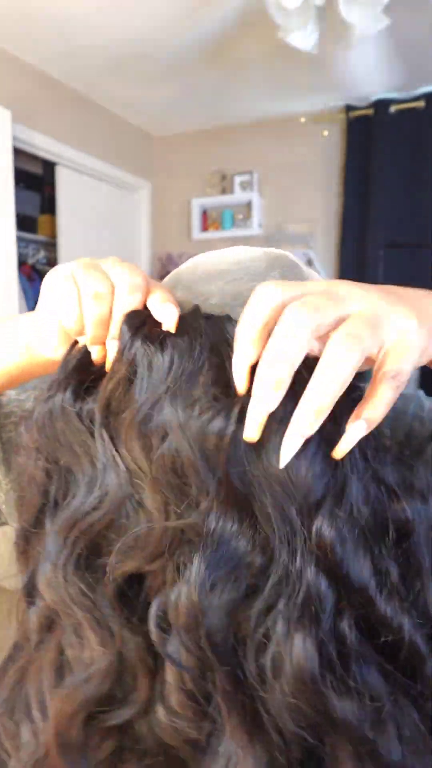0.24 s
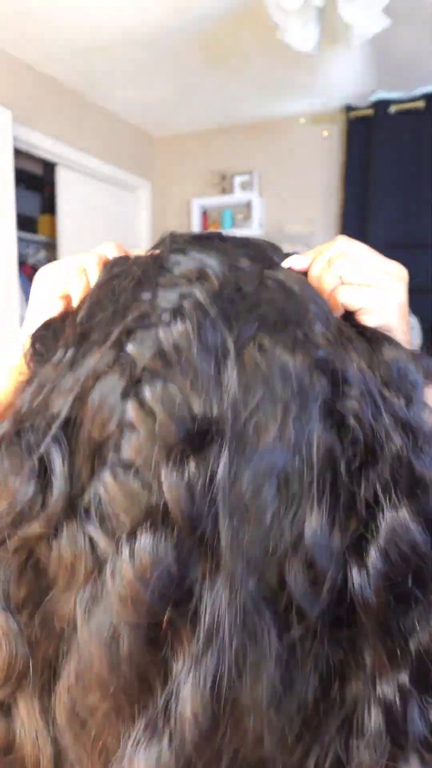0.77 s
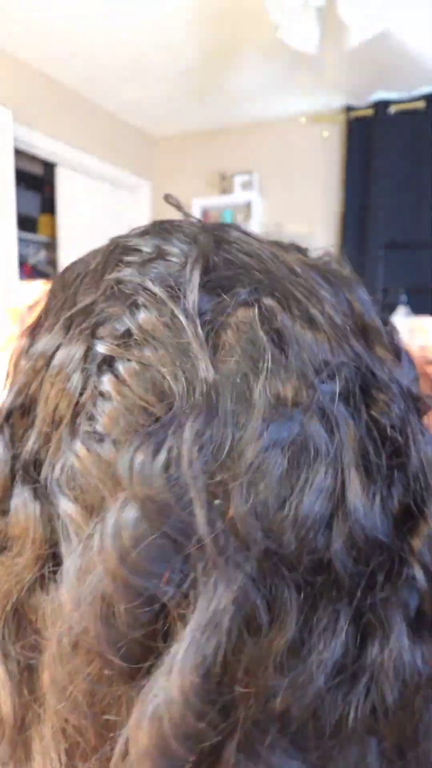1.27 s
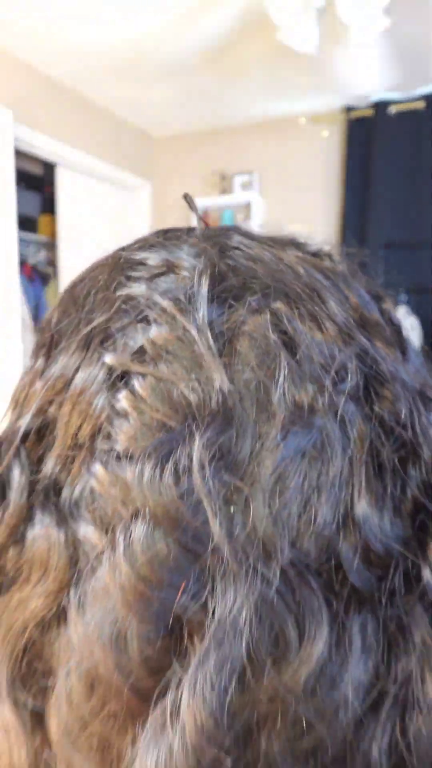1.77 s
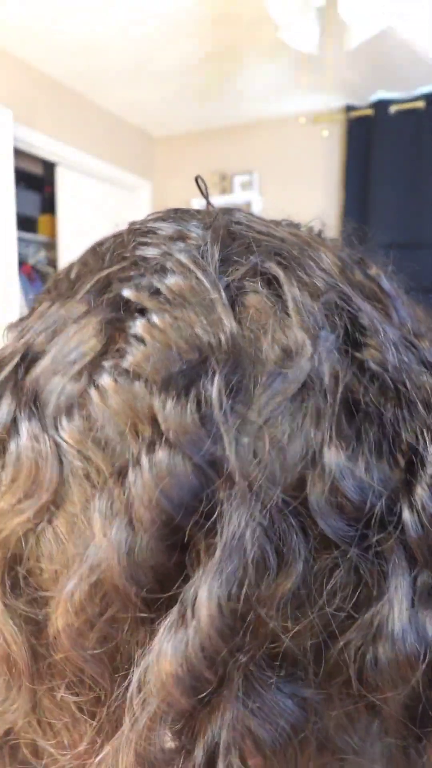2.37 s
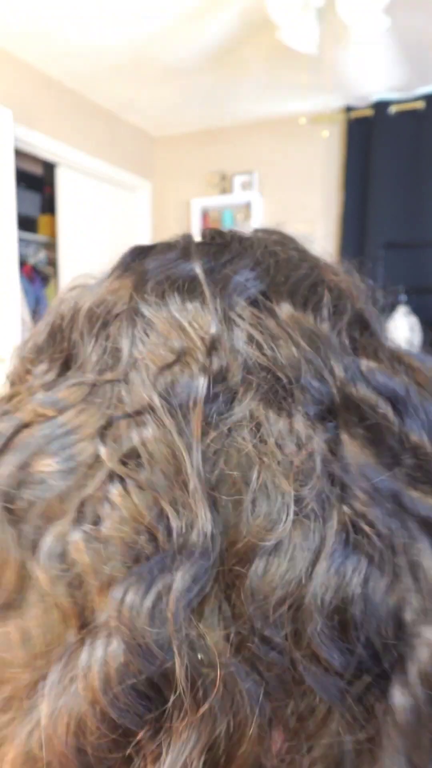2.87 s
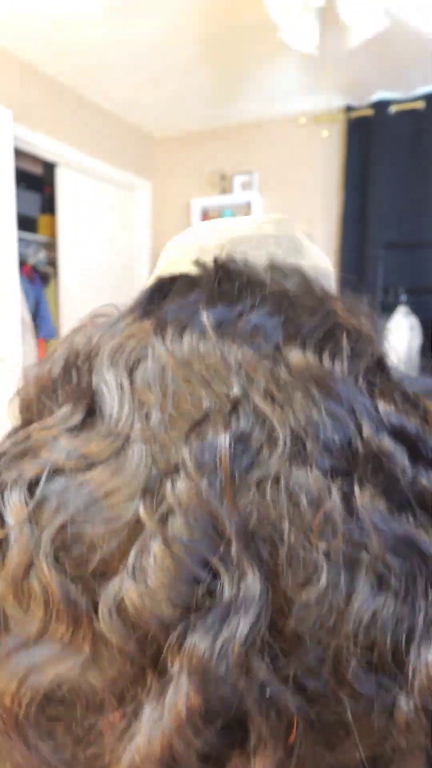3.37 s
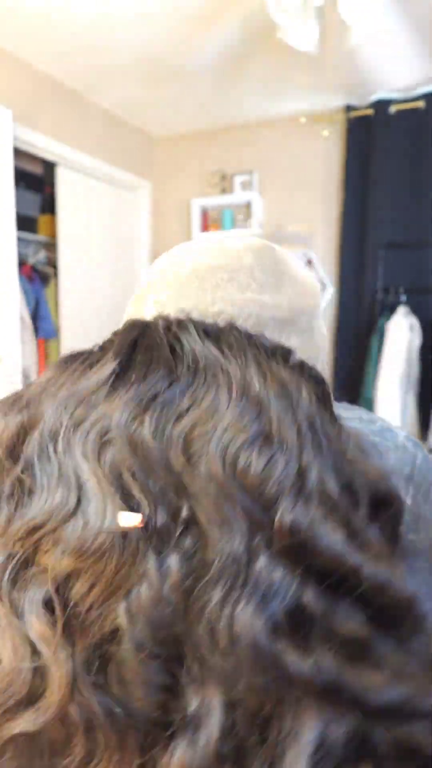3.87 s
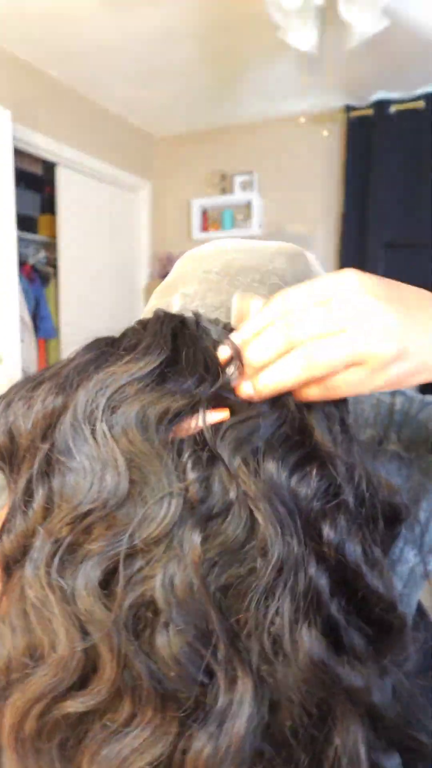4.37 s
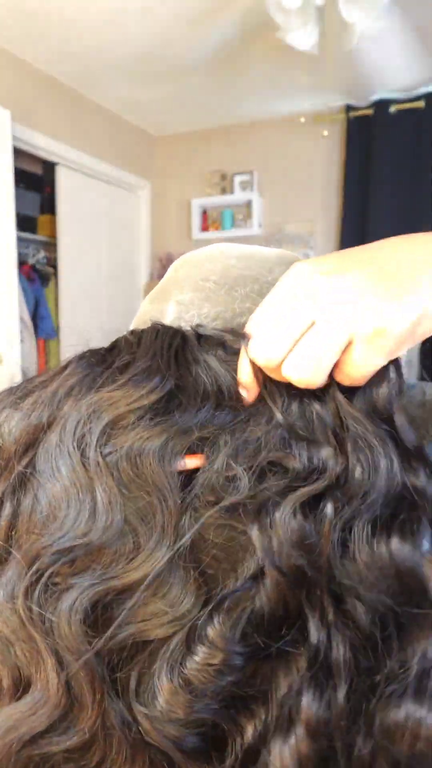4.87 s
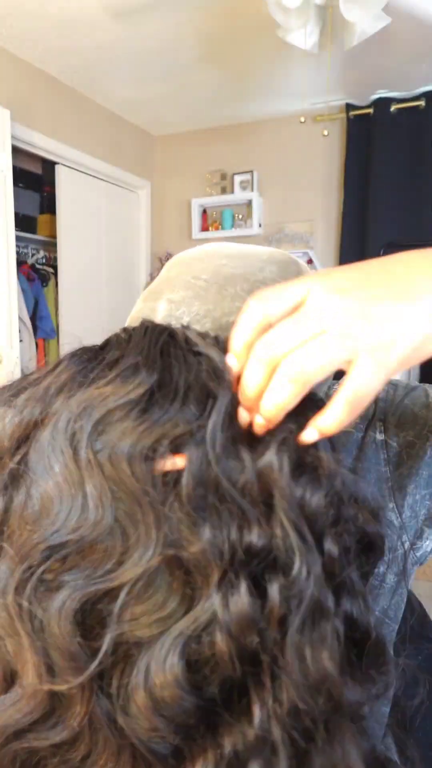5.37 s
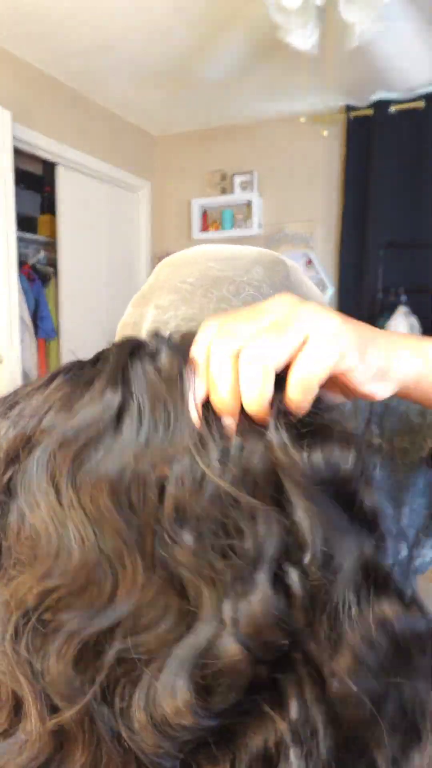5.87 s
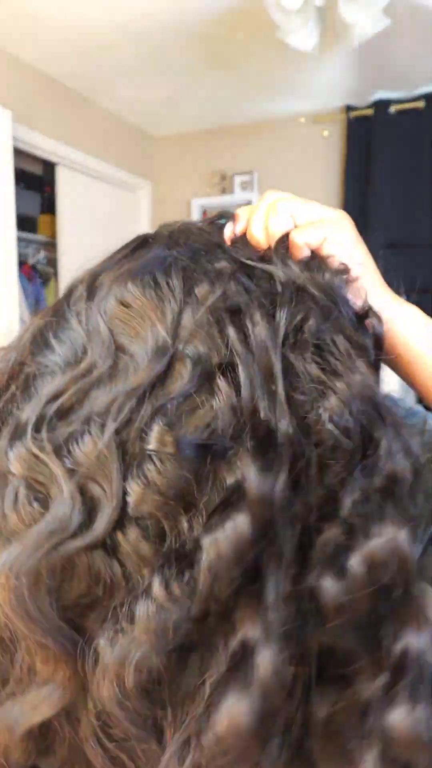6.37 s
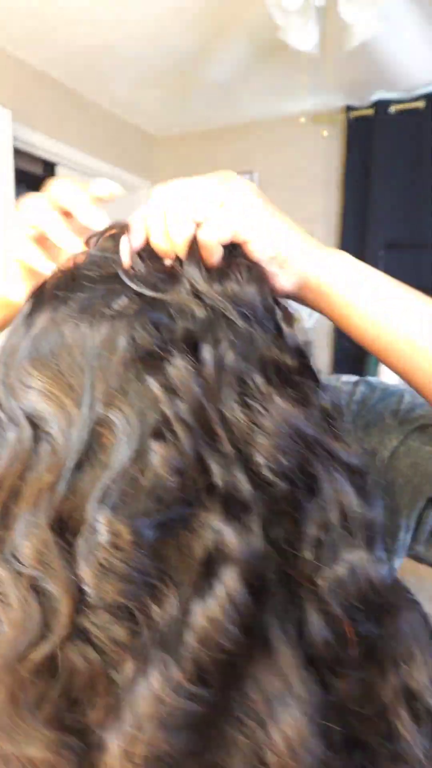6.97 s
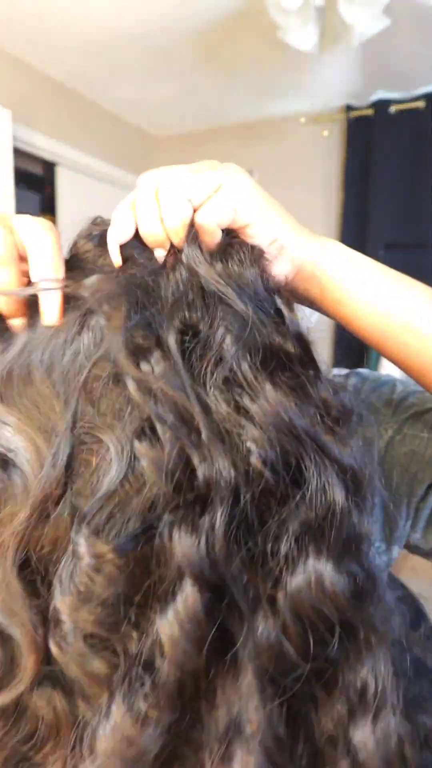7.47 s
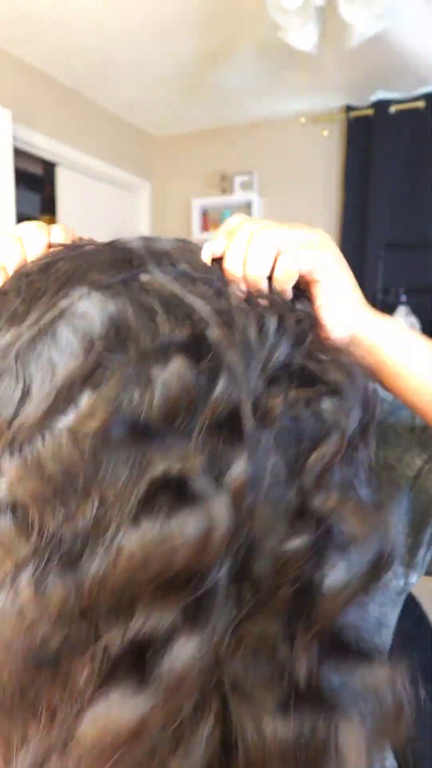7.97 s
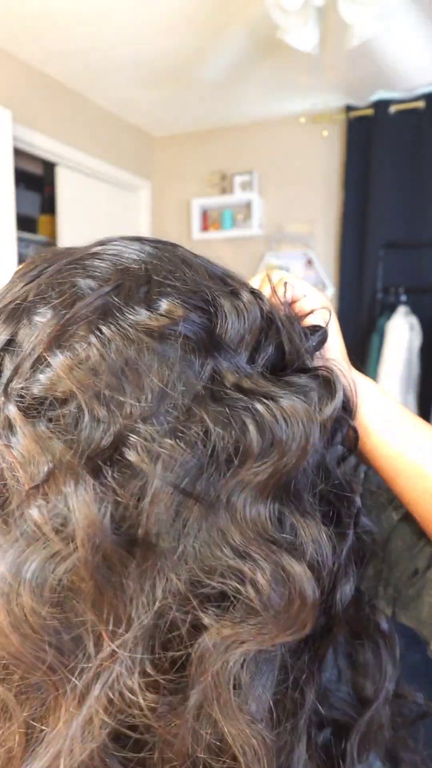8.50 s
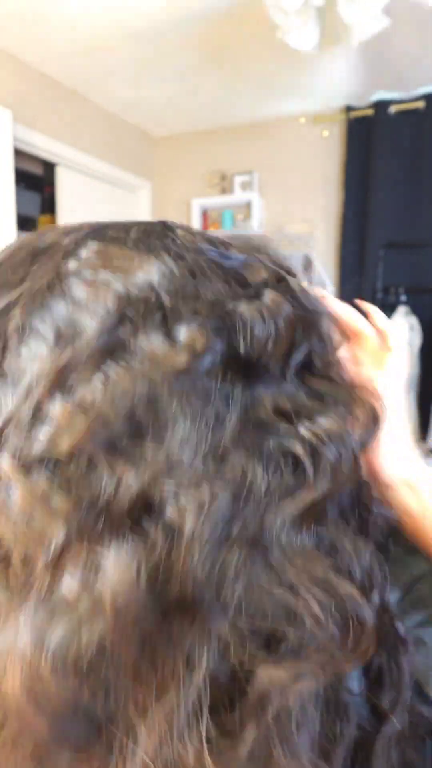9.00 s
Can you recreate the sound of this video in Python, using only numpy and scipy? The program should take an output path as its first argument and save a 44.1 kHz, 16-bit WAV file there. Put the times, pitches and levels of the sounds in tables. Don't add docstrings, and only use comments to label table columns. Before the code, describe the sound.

Close, crisp rustles and snapping snags of wavy fake hair being pulled about on a wig cap, in a quiet bedroom with faint motor hum.

```python
import sys
import numpy as np
from scipy import signal
from scipy.fft import rfft, irfft
from scipy.io import wavfile
from scipy.ndimage import uniform_filter1d, map_coordinates

SR = 44100
rng = np.random.default_rng(int(sys.argv[2]) if len(sys.argv) > 2 else 0)


def generate_wav(signal):
    frames = np.transpose(np.atleast_2d(signal))
    scaled = np.clip(frames, -1, 1) * 32767
    pcm = np.round(scaled).astype(np.int16)
    wavfile.write(sys.argv[1], SR, pcm)


def invert_db(level):
    return 10 ** (np.asarray(level, dtype=float) / 20)


N = 407484

# f/Hz, level/dB per Hz
HOUSE_COLOUR = [(25, -46), (45, -24), (100, 1.5), (170, 2.5), (250, 2), (340, -4), (400, -10.5),
                (600, -13.5), (1000, -20), (2000, -23), (4000, -26.5), (9000, -31), (15780, -39),
                (15950, -90)]
# f/Hz, width/Hz, level/dB rms
AIR_RESONANCES = [
    (57.2, 20, -69),
    (121.4, 11, -55.5),
    (143.8, 10.2, -55),
]
# f/Hz, level/dB per Hz
HAIR_COLOUR = [(500, 12), (800, 0.5), (1300, -7.5), (2400, -4.5), (3000, 0), (5000, 5), (8000, 5.5),
               (11000, 12.5), (13000, 11.5), (15300, 18), (15780, 4), (15950, -60)]
RANGE_EDGES_HZ = (1000, 3100, 9500, 15950)
# level/dB of cloth, fibres, finest strands
REST_LEVELS_DB = (-90, -86, -70)
# t/s at start of hold, hold/s, fibre level/dB, rise/ms per 10 dB,
# finer strands level/dB
PULLS = [(0, 0.03, -65, 50, -6), (0.557, 0.16, -50.5, 300, -1.5), (0.808, 0.014, -40, 53, 2),
         (0.86, 0.023, -46.5, 50, 0), (2.2, 0.17, -70, 200, 6.5), (2.44, 0.14, -58, 40, 3),
         (2.634, 0.044, -57, 200, 2.5), (2.755, 0.052, -47, 120, -1), (2.988, 0.039, -48.5, 90, 3),
         (3.237, 0.039, -55, 93, 0), (3.384, 0.016, -45, 88, 3), (5.174, 0.058, -62, 32, 1),
         (6.016, .34, -53, 180, 1), (7.7, .03, -58.5, 60, 4), (7.752, .02, -50, 40, 5),
         (7.883, .1, -50, 60, -0.5), (8.058, 0.09, -57, 100, 0), (8.331, 0.045, -49.5, 197, 1.5),
         (8.67, .08, -70, 100, 10)]
# t/s at peak, fibre level/dB, fade/ms per 10 dB, finer strands level/dB
STROKES = [(.127, -52, 100, 0), (.382, -51, 152, -1), (1.17, -57.5, 120, -7), (1.05, -59, 100, 1),
           (1.63, -59, 60, 5), (2.048, -61.5, 100, -9), (3.52, -64.5, 300, 4.5), (3.94, -72, 100, 14),
           (4.148, -65, 120, -4), (4.378, -57.5, 141, 3.5), (4.612, -64, 300, 6), (4.835, -53, 40, 2),
           (4.956, -59.5, 85, 1), (5.45, -55.5, 110, -3), (5.76, -62.5, 150, 0), (6.5, -63, 300, 6.5),
           (6.86, -61, 78, -8), (7.106, -60, 250, 3.5), (7.18, -65, 56, 8), (7.52, -63.5, 150, 9),
           (7.61, -55.5, 100, 5), (8.593, -54.5, 200, 6), (8.95, -55.5, 154, -2)]
# t/s, fibre level/dB, fade/ms per 10 dB, finer strands level/dB
SLITHERS = [
    (1.673, -39.5, 38, -7),
    (1.785, -53.5, 66, 0),
    (5.665, -57, 60, 3),
    (6.795, -54, 40, -8),
    (7.402, -56, 60, 2),
    (8.893, -55.5, 200, 0),
]
# t/s, level/dB against the fibres
CAP_DRAG = [(0, -8), (.5, -4.5), (1, -4), (1.6, -10.5), (2.7, -7), (4.6, -12.5), (5.4, -8), (6.2, -9),
            (7.3, -8.5), (7.9, -9), (8.6, -8), (9.24, -5)]
# t/s, fibre peak level/dB, cap cloth level/dB and finest strands level/dB against the fibres
SNAPS = [(.0794, -36.5, -4, 11), (.119, -26, -22, -13), (.2313, -33, -2.5, 1), (.3775, -33, 2, -8),
         (.4606, -37, -17, -3), (.6874, -31, -13, -15), (.7527, -27, -8, -13), (.81, -26, -12, -6),
         (.828, -16, -14, -17), (.861, -23, -24, -6), (.9021, -28.5, 1, -7), (1.7804, -26.5, -26, 7),
         (1.8056, -29, -21, -1), (2.419, -23, -26, -10), (2.4311, -31, -13, 3), (4.9839, -34.5, -18, -16),
         (5.228, -29, -18, -10), (5.6652, -35, -19, -9), (6.79, -17, -43, 3), (7.3995, -27, -22, 9),
         (7.4097, -36, -14, 12), (7.6084, -32.5, -14, 12.5), (7.7189, -31, -24, 2), (7.7313, -20, -30, -4),
         (7.7416, -20, -15, 13), (7.752, -30, -12, 5), (7.7989, -29, -8, -3), (7.8908, -20, -9, -9),
         (7.9526, -27, -14, -3), (8.3363, -21.5, -17, -2)]
# t/s, fibre peak level/dB, finest strands level/dB against the fibres
TICKS = [(.1127, -36, 0), (.6328, -39, -2), (.734, -30, -8), (.9302, -35, -3), (1.0521, -39, -8),
         (1.6101, -38, -11), (1.8332, -36, -4), (3.931, -43, 3), (4.241, -52, 17.5), (4.3717, -53, 15),
         (4.6448, -60, 19), (4.799, -54, 11), (4.9394, -38, -11), (5.4146, -36, -9), (5.481, -41, -11),
         (5.5732, -48, 6), (5.6873, -36, -18), (7.2501, -36.5, -7), (7.604, -43, 8), (8.353, -36, -10),
         (8.962, -37, 4), (9.05, -40, -6), (.572, -33, -4), (.939, -41, -4), (1.061, -41, -14),
         (4.832, -37, 0), (7.618, -42, 6)]
# t/s, fibre peak level/dB, finest strands level/dB against the fibres, decay/ms
RIPS = [
    (1.672, -28.5, -4, 5.3),
    (1.683, -25.5, -3, 4.7),
    (3.42, -35, 2, 1.5),
    (5.662, -36, -11, 3),
    (6.997, -41, -2, 1.6),
    (7.07, -49, -2, 1.1),
    (7.7488, -30, 8, 1.4),
]
# t/s, level/dB left minus right
HAND_PLACE = [
    (0, 2),
    (1.1, .3),
    (1.6, 12.5),
    (1.85, 2.5),
    (2.4, 2),
    (4, 0),
    (5.7, 3),
    (6.8, 3),
    (7.25, -3.5),
    (7.74, 2),
]
# t/s, peak level/dB, rise/ms, decay/ms, top f/Hz
BUMPS = [(.118, -43, 3.5, 11, 2000), (0.732, -47, 1.4, 45, 800), (4.245, -38.5, 12, 33, 750),
         (4.243, -49, 10, 24, 2000), (0.901, -47.5, 1.8, 23, 1400), (5.227, -47, 1.8, 9.1, 900),
         (6.52, -46, 8, 24, 390), (6.86, -49.5, 6.8, 25, 402), (7.25, -51, 2, 5, 1500),
         (7.739, -53, 1.8, 8, 900), (8.352, -60, 2.7, 15, 1800)]
# t/s, peak level/dB, ring f/Hz, t60/ms
KNOCKS = [(8.3535, -33, 1370, 10), (7.8905, -25, 2750, 9), (7.8905, -43, 1300, 18), (7.8905, -34, 1760, 12),
          (6.79, -43, 2340, 12), (0.19, -45, 2950, 12), (6.5, -46, 1070, 15), (6.79, -23, 10200, 8),
          (7.3995, -18, 11500, 5), (7.3995, -37, 3400, 8), (6.79, -27, 6200, 8), (7.7416, -13, 11500, 5),
          (2.419, -36, 3400, 8)]
# t/s, lag/ms, share of the direct sound
TABLE_BOUNCE = [
    (0, .655, .22),
    (3.5, .647, .2),
    (4.2, .647, .4),
    (5.8, .647, .38),
    (6.1, .63, .3),
    (6.9, .605, .2),
    (8, .6, .1),
    (9.24, .64, .1),
]


def level(x, db):
    return x * invert_db(db) / np.sqrt(np.mean(x ** 2))


def colour(x, points):
    hz, db = np.transpose(points)
    bins = np.fft.rfftfreq(N, 1 / SR) + 1
    gain = invert_db(np.interp(np.log(bins), np.log(hz), db))
    return irfft(rfft(x) * gain, N)


def band(x, lo_hz, hi_hz):
    sos = signal.butter(2, [lo_hz, hi_hz], "bandpass", fs=SR, output="sos")
    return signal.sosfilt(sos, x)


def walk(rate_hz):
    hold = int(SR / rate_hz)
    held = np.repeat(rng.standard_normal(N // hold + 1), hold)
    return 1.31 * uniform_filter1d(uniform_filter1d(held, hold), hold)[:N]


def opposed(x):
    return np.array([[x], [-x]])


def wide(mid, other, side_db):
    return mid + invert_db(side_db) * other * opposed(1)


def ranges(x):
    n = x.shape[-1]
    bins = np.fft.rfftfreq(n, 1 / SR) + 1
    spectrum = rfft(x)
    steepness = (6, 9, 8, 150)
    above = [1 / (1 + (hz / bins) ** steep) for hz, steep in zip(RANGE_EDGES_HZ, steepness)]
    return [irfft(spectrum * (above[k] - above[k + 1]), n) for k in range(3)]


def house():
    mid, other = (colour(rng.standard_normal(N), HOUSE_COLOUR) for _ in range(2))
    other = signal.lfilter(*signal.butter(1, 350, "highpass", fs=SR), other)
    return level(wide(mid, other, side_db=-4.5), -53.5)


def fan():
    motor_hz, motor_db = 258.6, -49
    strength = np.sqrt(2) * invert_db(motor_db + .5 * walk(2.85))
    tone = strength * np.sin(2 * np.pi * motor_hz * np.arange(N) / SR)
    air = 0
    for hz, width_hz, db in AIR_RESONANCES:
        air = air + level(band(rng.standard_normal(N), hz - width_hz / 2, hz + width_hz / 2), db)
    return tone * invert_db(opposed(1.7)) + air


def fibre_slips(share, scatter_db):
    size = invert_db(scatter_db * rng.exponential(size=N)) * rng.standard_normal(N)
    return np.clip(size, -7, 7) * (rng.random(N) < share)


def effort(s, hold_s, db, rise_ms, fade_ms):
    t_ms = 1000 * (np.arange(0, N, 64) / SR - s)
    away = np.maximum(-t_ms / rise_ms, (t_ms - 1000 * hold_s) / fade_ms)
    return invert_db(db - 10 * np.maximum(away, 0)) ** 2


def drag():
    release_ms = 59.5
    sudden_ms = 7
    moves = []  # (power, finer strands dB)
    for s, hold_s, db, rise_ms, fine_db in PULLS:
        moves.append((effort(s, hold_s, db, rise_ms, release_ms), fine_db))
    for s, db, fade_ms, fine_db in STROKES:
        rise_ms = 16.6 + .6 * fade_ms
        moves.append((effort(s, 0, db, rise_ms, fade_ms), fine_db))
    for s, db, fade_ms, fine_db in SLITHERS:
        moves.append((effort(s, 0, db, sudden_ms, fade_ms), fine_db))

    steps = np.arange(0, N, 64)
    fibres = sum(power for power, _ in moves)
    finest = sum(power * invert_db(-2 + fine_db) ** 2 for power, fine_db in moves)
    cloth = fibres * invert_db(np.interp(steps / SR, *np.transpose(CAP_DRAG))) ** 2
    gains = []
    for power, rest_db in zip((cloth, fibres, finest), REST_LEVELS_DB):
        gains.append(np.interp(np.arange(N), steps, np.sqrt(power + invert_db(rest_db) ** 2)))
    return gains


def slide():
    mid, other = (colour(fibre_slips(share=.3, scatter_db=1.0), HAIR_COLOUR) for _ in range(2))
    hair = 0
    for part, gain in zip(ranges(wide(mid, other, side_db=-11.5)), drag()):
        hair = hair + level(part, 0) * gain * invert_db(0.2 * walk(13))
    return hair * invert_db(1.12 * walk(60) + opposed(.4))


def snaps():
    snap_ms = 0.31
    loose_cap_db = -17.5
    rip_rise = 0.41
    snags = [(*row, snap_ms) for row in SNAPS]
    snags += [(s, db, loose_cap_db, fine_db, snap_ms) for s, db, fine_db in TICKS]
    snags += [(s, db, loose_cap_db, fine_db, ms) for s, db, fine_db, ms in RIPS]

    out = np.zeros((2, N + 2048))
    t = np.arange(-256, 1792) / SR
    for s, peak_db, cap_db, fine_db, ms in snags:
        fade = np.exp(-1000 * np.abs(t) / ms) + .16 * np.exp(-t / 0.005)
        swell = np.clip(1 + 1000 * t / (rip_rise * ms), 0, 1)
        burst = rng.standard_normal(2048) * swell * fade
        burst[256] += 4.5
        burst = signal.lfilter([1, -.6], 1, burst)
        snap = 0
        for part, db in zip(ranges(burst), (cap_db, 0, fine_db)):
            snap = snap + invert_db(peak_db + db + 0.2) * part / np.abs(part).max()
        i = int(s * SR) - 256
        pan_db = np.interp(s, *np.transpose(HAND_PLACE))
        out[:, i:i + 2048] += invert_db(opposed(pan_db) / 2) * snap
    return out[:, :N]


def bumps():
    out = np.zeros(N + 8192)
    t_ms = 1000 * np.arange(8192) / SR
    for s, db, rise_ms, decay_ms, top_hz in BUMPS:
        rise = np.minimum(t_ms / rise_ms, 1) ** 2
        decay = np.exp(-np.maximum(t_ms - rise_ms, 0) / decay_ms)
        dull = signal.lfilter(*signal.butter(1, top_hz / 3, fs=SR), rng.standard_normal(8192))
        i = int(s * SR)
        out[i:i + 8192] += level(band(dull, 140, top_hz), db) * rise * decay
    return out[:N]


def knocks():
    out = np.zeros(N + 2048)
    t = np.arange(2048) / SR
    for s, db, hz, t60_ms in KNOCKS:
        i = int(s * SR)
        out[i:i + 2048] += invert_db(db - 60 * 1000 * t / t60_ms) * np.sin(2 * np.pi * hz * t)
    return out[:N]


def table(x):
    s, lag_ms, share = np.transpose(TABLE_BOUNCE)
    n = np.arange(N)
    lag = np.interp(n / SR, s, lag_ms * SR / 1000)
    share = np.interp(n / SR, s, share)
    late = np.array([map_coordinates(side, [n - lag], order=3) for side in x])
    return (x + share * late) / np.sqrt(1 + share ** 2)


def room(x):
    t60_s, gap_s, tail_db = .22, .006, -12
    t = np.arange(SR // 2) / SR
    fade = np.exp(-np.log(1000) * t / t60_s) * np.clip(t / gap_s, 0, 1) ** 2
    mid, other = rng.standard_normal((2, len(t))) * fade
    tail = mid + 0.68 * other * opposed(1)
    tail = signal.lfilter(*signal.butter(1, 9000, fs=SR), tail)
    tail = tail * invert_db(tail_db) / np.sqrt(np.sum(tail ** 2) / 2)
    return signal.fftconvolve(x, tail, axes=1)[:, :N]


def scene():
    near = snaps() + knocks() + bumps()
    return table(near + slide()) + room(near) + fan() + house()


def low_pass(x):
    return signal.sosfilt(signal.butter(12, 17180, fs=SR, output="sos"), x)


def record(dry):
    cut = signal.ellip(8, .2, 70, 16300, fs=SR, output="sos")
    mix = signal.sosfilt(cut, dry)
    return low_pass(mix)


dry = scene()
out = record(dry)
generate_wav(out)
```